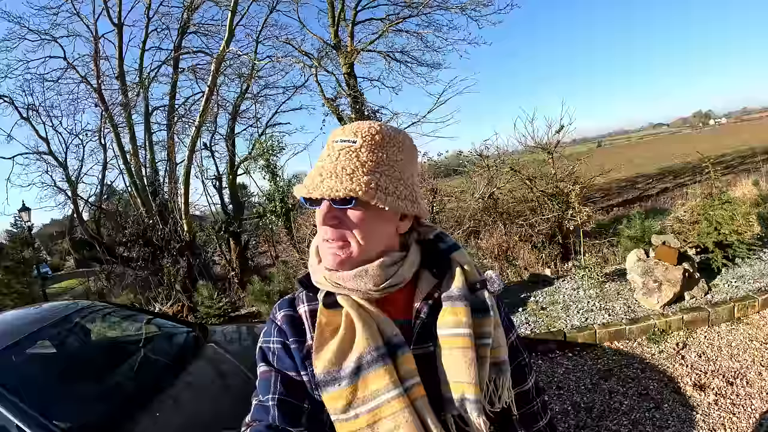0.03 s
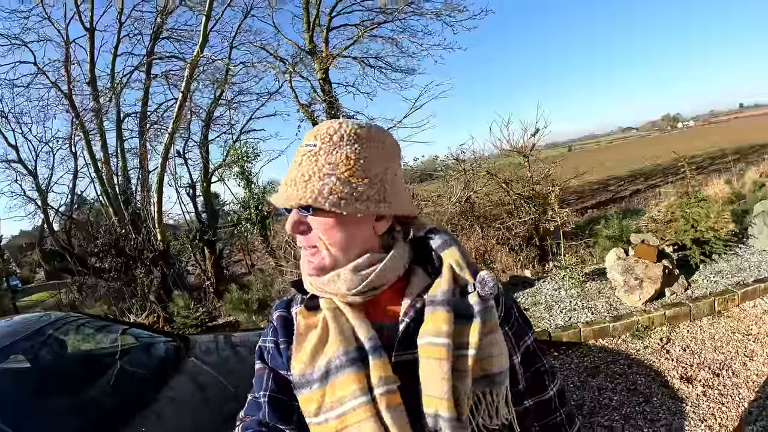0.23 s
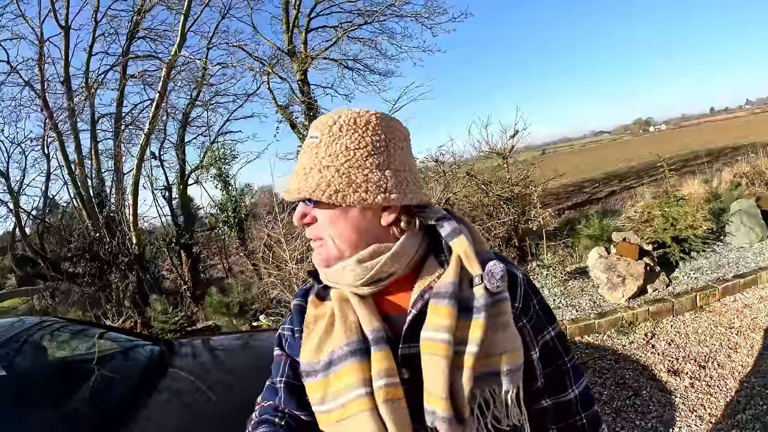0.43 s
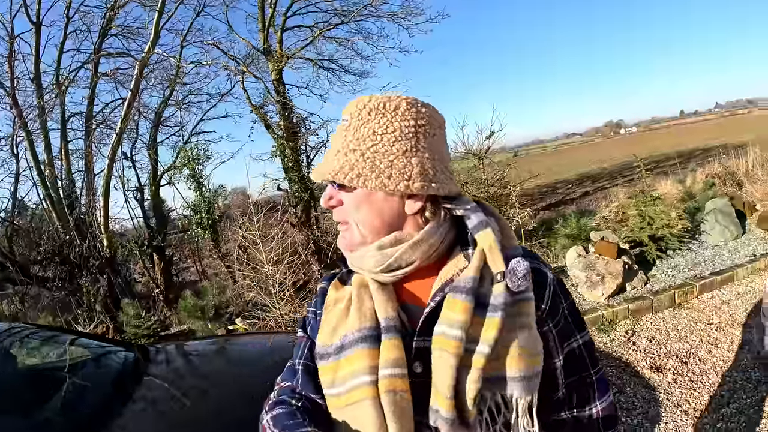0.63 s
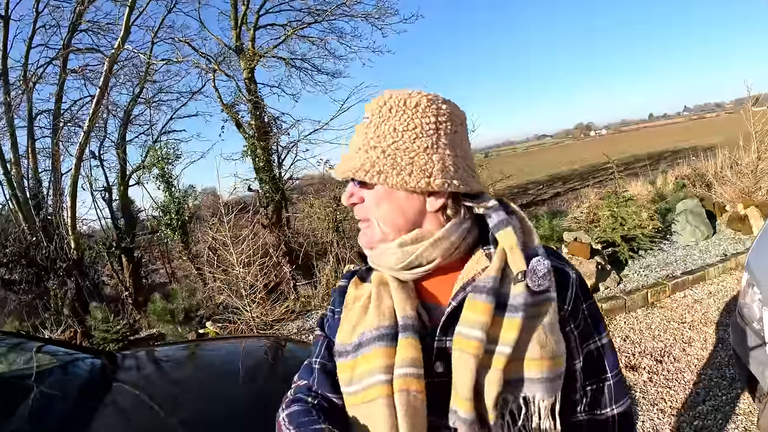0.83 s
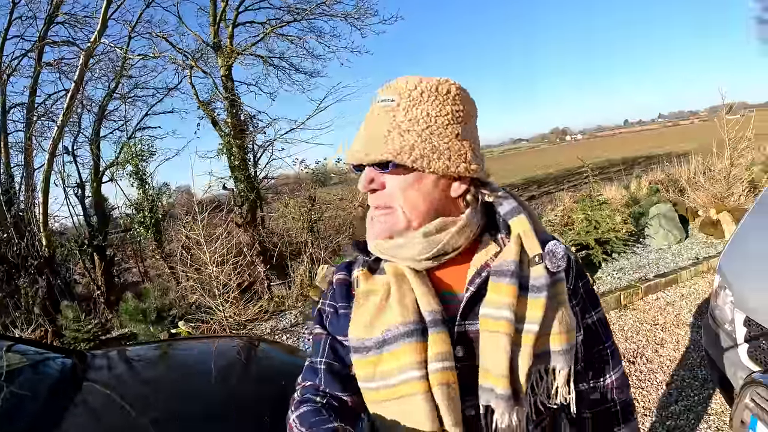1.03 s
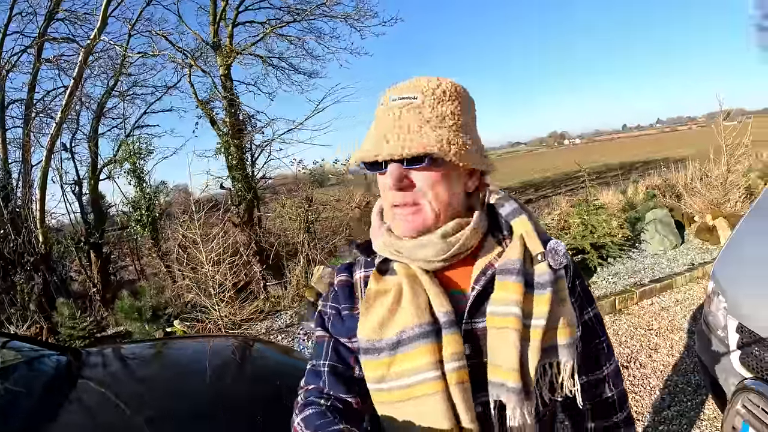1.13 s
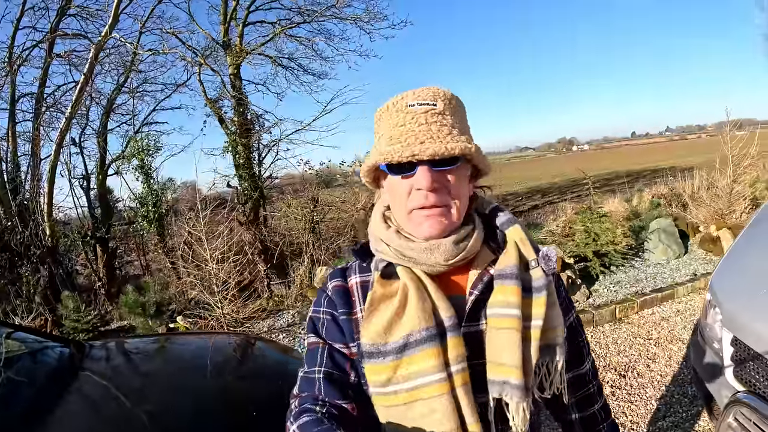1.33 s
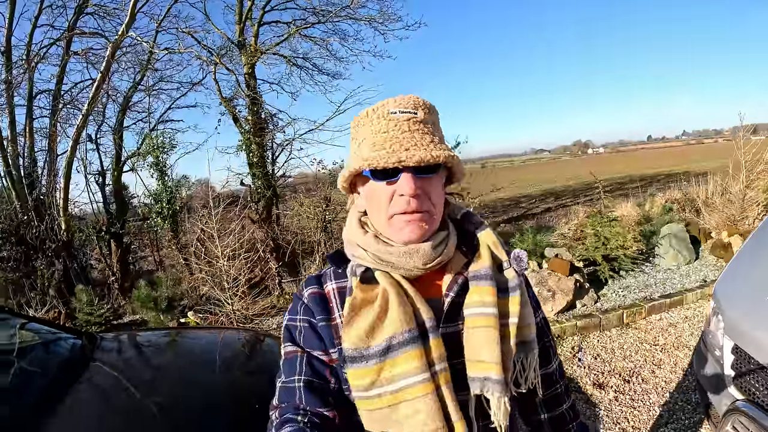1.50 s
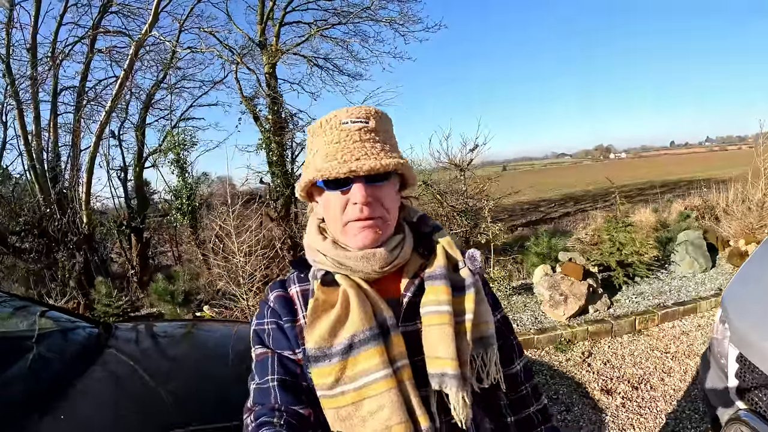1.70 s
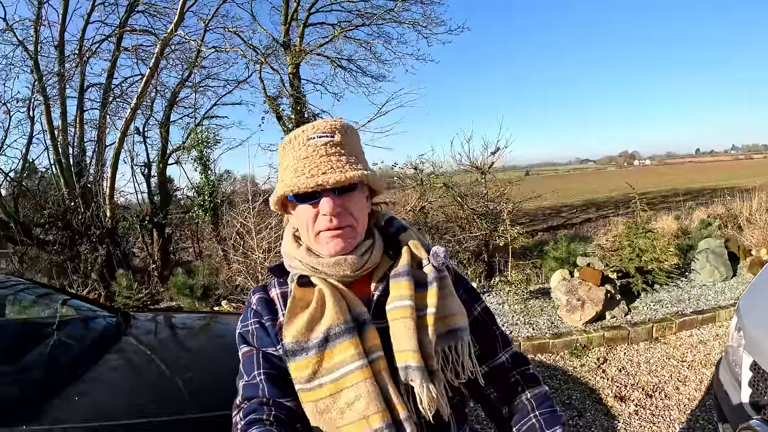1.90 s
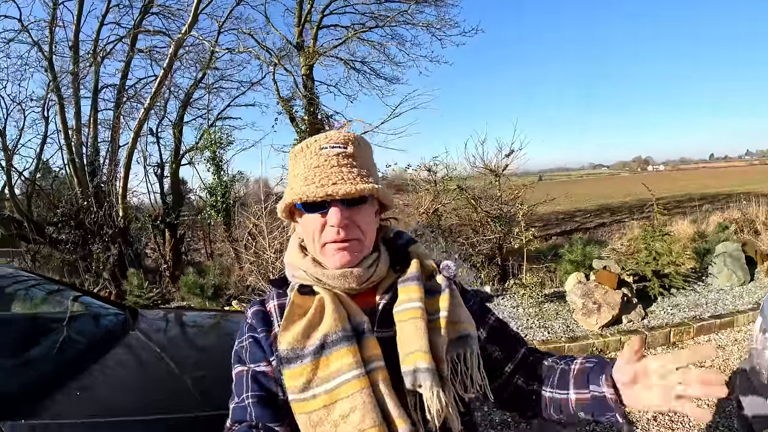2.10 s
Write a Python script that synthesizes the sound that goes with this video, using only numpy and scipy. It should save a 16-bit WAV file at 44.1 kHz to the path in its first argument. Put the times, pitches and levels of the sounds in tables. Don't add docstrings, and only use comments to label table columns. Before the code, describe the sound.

Gravel crunches and knocks under shifting feet on a quiet drive, with faint bird chirps

```python
import sys
import numpy as np
from scipy import signal
from scipy.fft import rfft, irfft, next_fast_len
from scipy.io import wavfile
from scipy.ndimage import uniform_filter1d

SR = 44100
rng = np.random.default_rng(int(sys.argv[2]) if len(sys.argv) > 2 else 0)


def wav_record(signal):
    frames = np.transpose(np.atleast_2d(signal))
    bounded = np.clip(frames, -1, 1)
    quanta = np.round(bounded * 32767).astype(np.int16)
    wavfile.write(sys.argv[1], SR, quanta)


def volts_from_decibels(level):
    exponent = np.asarray(level, float) / 20
    return 10 ** exponent


N = 94815


def unit(x):
    return x / np.sqrt(np.mean(x ** 2) + 1e-20)


def along(points, hz):
    point_hz, value = np.transpose(points)
    return np.interp(np.log(hz + 1), np.log(point_hz + 1), value)


def filtered(x, response):
    size = next_fast_len(N + 8192)
    spectrum = rfft(x, size) * response(np.fft.rfftfreq(size, 1 / SR))
    return irfft(spectrum, size)[..., :N]


def press(t, rise_s, fall_s):
    return np.exp(np.where(t < 0, t / rise_s, -t / fall_s))


def struck(start_s, hz, cycles, size, rise=4, count=800):
    phase = hz[:, None] * np.arange(count) / SR
    decay = np.exp(-np.log(1000) * phase / (2 * cycles))
    wave = size[:, None] * np.sin(2 * np.pi * phase) * decay * (1 - np.exp(-rise * phase))
    at = np.clip((start_s * SR).astype(int), 0, N)[:, None] + np.arange(count)
    return np.bincount(at.ravel(), wave.ravel(), N + count)[:N]


# frequency in Hz, level in dB per Hz.
AIR_SPECTRUM = [(50, -8), (220, -12), (400, -4.5), (1000, -9.5), (1600, -18.5), (3300, -20), (9500, -26),
                (15500, -30.5)]
# frequency in Hz, correlation from 0 to 1.
AIR_LIKENESS = [(100, 1), (1000, 0.9), (4000, 0.6), (12000, 0.21)]


def air():
    level_db = -70

    def mid_side_gain(hz):
        turn_rad = np.arccos(np.clip(along(AIR_LIKENESS, hz), -1, 1)) / 2
        return volts_from_decibels(along(AIR_SPECTRUM, hz)) * [np.cos(turn_rad), np.sin(turn_rad)]

    mid, side = filtered(rng.standard_normal((2, N)), mid_side_gain)
    return volts_from_decibels(level_db) * unit(np.array([mid + side, mid - side]))


def patchy(x, depth_db):
    z = signal.stft(x, nperseg=256)[2]
    field = uniform_filter1d(rng.standard_normal(z.shape), size=5, axis=0)
    field = uniform_filter1d(field, size=7, axis=1)
    return signal.istft(z * volts_from_decibels(depth_db * unit(field)), nperseg=256)[1][:N]


# frequency in Hz, level in dB per Hz.
GRIT_SPECTRUM = [(1000, -18), (1700, -4.5), (3250, 0), (4050, -5.5), (5060, -2), (9580, -13.5),
                 (10800, -33), (12400, -20), (15500, -56)]
# peak in seconds, level in dB, tilt in dB (added to bright, taken from dull),
# rise in seconds, fall in seconds.
GRINDS = [(.25, -72, 0, 0.21, 0.04), (0.489, -68.5, 1, 0.044, 0.0092), (0.558, -79.5, -9, 0.094, 0.076),
          (0.701, -62, 4, 0.0066, 0.024), (.733, -52, 2.5, 0.012, 0.033),
          (0.762, -51.5, 1.5, 0.017, 0.0036), (.82, -69, -2.5, 0.021, 0.075),
          (0.893, -65, 1.5, 0.014, 0.052), (0.97, -49.5, 2.5, 0.014, 0.0156),
          (.985, -57.5, 6, 0.006, 0.011), (1.019, -64.5, 0.5, 0.056, 0.034),
          (1.075, -80.5, 18.5, 0.0058, 0.012), (1.22, -72, 4, 0.00044, 0.0025),
          (1.246, -69, 5.5, 0.0058, 0.016), (1.292, -66.5, 1.5, 0.011, 0.042),
          (1.35, -58.5, 3, 0.0019, 0.038), (1.432, -60.5, 1.5, 0.046, 0.037), (1.485, -68, 0, 0.022, 0.043),
          (1.746, -72.5, 0, .002, 0.066), (1.9, -73, 3.5, 0.034, 0.048)]


def grit():
    cracks_per_s, scatter_db, patch_db, split_hz = 6600, 3, 2, 4500
    t = np.arange(N) / SR
    hit = rng.random(N) < cracks_per_s / SR
    size = volts_from_decibels(scatter_db * np.minimum(rng.exponential(1, N), 3))
    cracks = hit * size * rng.standard_normal(N)
    whole = unit(filtered(patchy(cracks, patch_db), lambda hz: volts_from_decibels(along(GRIT_SPECTRUM, hz))))
    bright = filtered(whole, lambda hz: 1 / (1 + (split_hz / (hz + 1)) ** 4))
    dull = whole - bright

    def level(sign):
        power = 0
        for peak_s, db, tilt_db, rise_s, fall_s in GRINDS:
            power = power + (volts_from_decibels(db + sign * tilt_db) * press(t - peak_s, rise_s, fall_s)) ** 2
        return np.sqrt(power)

    return level(1) * bright + level(-1) * dull


def note(hz, db, start_s):
    n = len(hz)
    hoarse = unit(uniform_filter1d(rng.standard_normal(n), size=160))
    envelope = np.sin(np.pi * np.arange(n) / n) ** 0.44 * volts_from_decibels(1.3 * hoarse)
    wave = np.sqrt(2) * volts_from_decibels(db) * envelope * np.sin(2 * np.pi * np.cumsum(hz) / SR)
    return np.pad(wave, (int(start_s * SR), N))[:N]


# start in seconds, length in seconds, level in dB.
CHIRPS = [
    (0.167, 0.066, -69),
    (0.257, 0.064, -63.5),
    (0.313, 0.053, -62.5),
    (0.385, 0.065, -65),
    (0.446, 0.071, -62),
]
# start in seconds, length in seconds,
# first pitch in Hz, last pitch in Hz, level in dB.
WHISTLES = [(1.672, .022, 3520, 3480, -81), (1.694, .018, 3550, 4000, -76), (1.83, .042, 3150, 3030, -76),
            (1.878, .062, 2980, 2870, -71), (1.952, .042, 2860, 2790, -74), (2.012, .04, 2790, 2830, -77),
            (2.058, .078, 2850, 2840, -84), (1.815, .025, 6550, 6200, -76), (1.845, .04, 6200, 6150, -80),
            (2.0, .065, 5620, 5670, -78), (2.07, .052, 5700, 5700, -85), (1.338, .028, 3380, 3420, -68),
            (.6, .075, 1980, 1900, -87), (.476, .016, 3150, 3250, -78), (.5, .015, 3250, 3100, -78)]


def birds():
    top_hz, end_hz, drop_s, swell_db, final_lift_hz = 6350, 4930, .023, 26, 180
    out = np.zeros(N)
    for start_s, length_s, db in CHIRPS:
        t = np.arange(int(length_s * SR)) / SR
        slide_hz = (top_hz - end_hz) * np.exp(-(t / drop_s) ** 1.74)
        hz = end_hz + slide_hz + final_lift_hz * (t / length_s) ** 5
        out += note(hz, db + swell_db * (np.sqrt(t / length_s) - 1), start_s)
    for start_s, length_s, first_hz, last_hz, db in WHISTLES:
        out += note(np.linspace(first_hz, last_hz, int(length_s * SR)), db, start_s)
    return out


# peak in seconds, level in dB, stone pitch in Hz,
# rise in seconds, fall in seconds.
PRESSES = [(0.244, -48, 1163, .015, 0.025), (.33, -60, 1170, .04, .03), (.42, -65, 1110, 0.027, 0.055),
           (0.579, -73, 818, 0.068, 0.067), (.735, -46.5, 880, 0.021, 0.022),
           (.757, -49.5, 484, 0.016, 0.01), (0.822, -56.5, 876, 0.032, 0.026),
           (0.907, -49.5, 920, .012, 0.017), (.95, -44.5, 933, .025, .02), (0.981, -36.5, 985, .02, 0.0065),
           (0.981, -50.5, 437, 0.03, .012), (1.015, -53.5, 694, .015, .025),
           (1.242, -63.5, 369, 0.046, 0.041), (1.295, -45.5, 310, .005, .03), (1.35, -47, 340, .02, 0.035),
           (1.429, -43.5, 401, .015, 0.03), (1.491, -55.5, 418, 0.031, 0.082),
           (1.755, -58.5, 880, .01, 0.057), (1.907, -55, 703, .02, 0.016),
           (1.958, -64.5, 910, 0.027, 0.062)]
# frequency in Hz, gain in dB.
BED = [(190, -19.5), (290, 1.5), (400, -1), (700, -5.5), (1100, 1.5), (1500, -9), (2500, -15.5),
       (6000, -27)]


def rolling_stones():
    count, spread, cycles, scatter_db = 220, .36, 5, 5
    peak_s, db, hz, rise_s, fall_s = np.transpose(PRESSES)[..., None]
    draw = rng.random((len(PRESSES), 4, count))
    span_s = 3.5 * (rise_s + fall_s)
    t = span_s * draw[:, 0] - 3.5 * rise_s
    bend = 2 * (draw[:, 1] + draw[:, 2] - 1)
    pitch_hz = hz * np.exp(spread * np.sqrt(600 / hz) * bend)
    crowd = count / span_s / pitch_hz
    size = volts_from_decibels(db + scatter_db * 2 * draw[:, 3]) * press(t, rise_s, fall_s) / np.sqrt(crowd)
    rolled = struck((peak_s + t).ravel(), pitch_hz.ravel(), cycles, 1.34 * size.ravel())
    return filtered(rolled, lambda hz: volts_from_decibels(along(BED, hz)))


# start in seconds, peak in dB, pitch in Hz.
KNOCKS = [(0.2382, -42, 1124), (0.2462, -44.5, 1175), (0.2582, -47, 1030), (0.2671, -47.5, 1100),
          (0.2803, -56.5, 910), (0.2846, -54, 1200), (0.302, -58, 1080), (0.3216, -56, 1080),
          (0.3354, -48, 1240), (0.4144, -60, 1330), (0.4225, -65, 1290), (0.5025, -63.2, 584),
          (0.528, -59, 1130), (0.566, -59, 606), (0.5906, -61.5, 917), (0.625, -56.5, 1010),
          (0.7219, -57, 850), (0.7268, -41.5, 730), (0.7329, -48, 1100), (0.7375, -45.9, 905),
          (0.7446, -46.5, 990), (0.7461, -41, 610), (0.7486, -43, 970), (0.756, -36, 1200),
          (0.7648, -43.5, 1100), (0.767, -50, 1190.0), (0.7778, -49, 834), (0.7828, -53, 694),
          (0.8074, -59, 770.0), (0.8144, -60, 586), (0.8283, -57.5, 1110), (0.8292, -61, 845),
          (0.84, -59.5, 1000.0), (0.845, -57, 1230), (0.8942, -51, 590), (0.9011, -45.5, 885),
          (0.9071, -46, 776), (0.919, -46.5, 880), (0.9272, -47, 980), (0.9291, -38, 900),
          (0.9353, -40.5, 970), (0.9441, -46, 890), (0.9479, -53, 1000.0), (0.9527, -34, 1070),
          (0.9609, -33.5, 920.0), (0.9672, -36, 1290), (0.9718, -49, 1180), (0.9801, -39, 985),
          (0.9826, -40, 610), (1.0039, -60, 940), (1.0092, -50.5, 1520), (1.0115, -45, 800),
          (1.0283, -46, 1000.0),
          (1.1744, -83, 447), (1.2176, -64, 335), (1.2879, -47, 718), (1.2924, -52.5, 556),
               (1.2964, -53.5, 930), (1.2988, -44.5, 290), (1.3309, -52, 303), (1.3316, -47, 487),
               (1.3421, -53, 472), (1.3488, -51, 326), (1.3747, -50.5, 510), (1.4064, -45.5, 700),
               (1.4148, -47.7, 293), (1.4237, -40.5, 833), (1.428, -46.5, 547), (1.4325, -44, 272),
               (1.4445, -46.5, 342), (1.4495, -48, 545), (1.46, -54, 503), (1.468, -49, 700),
               (1.4737, -53.5, 493), (1.4804, -52, 724), (1.4926, -50.5, 550.0), (1.508, -58.5, 290),
               (1.5374, -57, 510), (1.6863, -55, 1005), (1.746, -54, 1190.0), (1.747, -65, 606),
               (1.7542, -76, 1180), (1.755, -54, 570), (1.7723, -68, 1050), (1.776, -65, 1010),
               (1.7988, -62, 1080), (1.8265, -51.5, 1060), (1.8905, -53.5, 1110), (1.8934, -58, 1080),
               (1.8998, -59, 1120), (1.9039, -54, 920.0), (1.9103, -51.5, 405), (1.9111, -50.5, 1090.0),
               (1.9242, -60, 880), (1.9547, -58, 1070), (1.9602, -60, 1070), (2.0091, -60.5, 940),
               (2.0837, -60, 620)]


def knocks():
    start_s, db, hz = np.transpose(KNOCKS)
    return struck(start_s, hz, 5.08, volts_from_decibels(db + 9), rise=1.98)


# centre in seconds, level in dB.
THUDS = [
    (0.245, -58.5),
    (0.33, -61.5),
    (0.745, -70),
    (0.974, -57.5),
    (1.074, -70),
    (1.198, -71),
    (1.298, -62.5),
    (1.364, -64),
    (1.717, -63.5),
]


def thuds():
    pitch_hz, width_s = 104.7, 0.0092
    out = np.zeros(N)
    for centre_s, db in THUDS:
        t = np.arange(N) / SR - centre_s
        out += np.sqrt(2) * volts_from_decibels(db) * np.exp(-(t / width_s) ** 2) * np.sin(2 * np.pi * pitch_hz * t)
    return out


# start in seconds, peak in dB, pitch in Hz.
SNAPS = [
    (.3351, -50, 1250),
    (.5652, -58, 630),
    (.6981, -52, 765),
    (.7561, -33, 796),
    (.9357, -34.5, 665),
    (1.2184, -56, 403),
]


def snaps():
    start_s, db, hz = np.transpose(SNAPS)
    cracks = struck(start_s, hz, 2.25, 2 * volts_from_decibels(db))
    return filtered(cracks, lambda hz: 1 / (1 + (330 / (hz + 1)) ** 4))


# start in seconds, level in dB.
TICKS = [(0.337, -52.5), (0.567, -56.5), (0.697, -60.5), (.728, -57), (0.7555, -56), (0.9633, -45),
         (1.219, -58.5), (1.29, -66), (1.346, -52), (1.421, -52), (1.747, -66)]


def ticks():
    start_s, db = np.transpose(TICKS)
    hz = 3500 * np.exp(rng.normal(0, 0.2, len(start_s)))
    return struck(start_s, hz, 7.1, volts_from_decibels(db))


# peak in seconds, level in dB, pitch in Hz, rise in seconds, fall in seconds.
SINGS = [
    (0.734, -53.5, 5020, 0.011, 0.018),
    (0.76, -50, 5350, 0.0043, 0.0033),
    (.966, -50.5, 2016, 0.0073, 0.012),
    (1.44, -63.5, 6530, .03, .03),
]


def sings():
    t = np.arange(N) / SR
    out = np.zeros(N)
    for peak_s, db, pitch_hz, rise_s, fall_s in SINGS:
        noise = rng.standard_normal(N)
        band = unit(filtered(noise, lambda hz: 1 / (1 + ((hz - pitch_hz) / (0.055 * pitch_hz)) ** 2)))
        out += volts_from_decibels(db) * press(t - peak_s, rise_s, fall_s) * band
    return out


def scattered(x, t60_s):
    t = np.arange(SR // 5) / SR
    tail = rng.standard_normal(len(t)) * volts_from_decibels(-60 * t / t60_s)
    return signal.fftconvolve(x, tail / np.linalg.norm(tail))[:N]


# frequency in Hz, side relative to middle in dB.
WIDTH = [(300, -47), (1000, -26.5), (3000, -14.5), (8000, -14.5)]


def scene():
    echo_db, echo_t60_s = -13, .07
    bird_echo_db, bird_t60_s = -8, .12
    thud_side_db, thud_side_delay = -19, SR // 400
    calls, push = birds(), thuds()
    near = grit() + rolling_stones() + knocks() + push + snaps() + ticks() + sings()
    mid = near + volts_from_decibels(echo_db) * scattered(near, echo_t60_s)
    mid = mid + calls + volts_from_decibels(bird_echo_db) * scattered(calls, bird_t60_s)
    side = filtered(scattered(mid, 0.0094), lambda hz: volts_from_decibels(along(WIDTH, hz)))
    side = side + volts_from_decibels(thud_side_db) * np.roll(push, thud_side_delay)
    return np.array([mid + side, mid - side]) + air()


def low_pass(x):
    return signal.sosfilt(signal.butter(12, 15710, fs=SR, output="sos"), x)


OFFSET = (-.1935, -.1972)


def record(dry):
    fade_start_s, fade_s, drain_s = .15, .1, .96
    t = np.arange(N) / SR - fade_start_s
    fade = .5 - .5 * np.cos(np.pi * np.clip(t / fade_s, 0, 1))
    offset = np.array(OFFSET)[:, None] * np.exp(-(t - fade_s) / drain_s)
    return low_pass(fade * (dry + offset))


dry = scene()
out = record(dry)
wav_record(out)
```